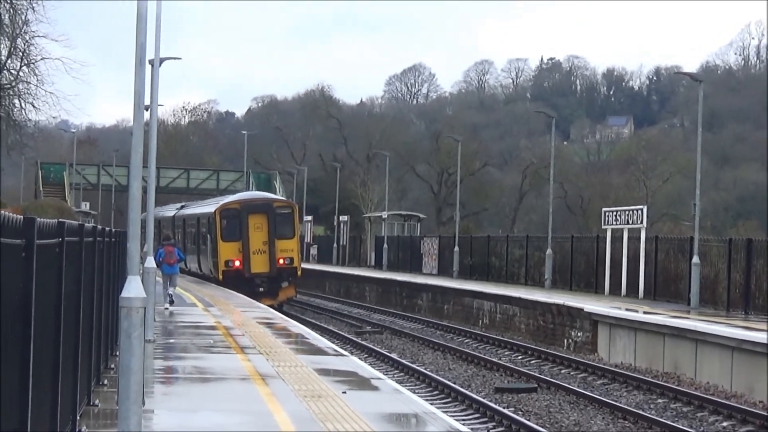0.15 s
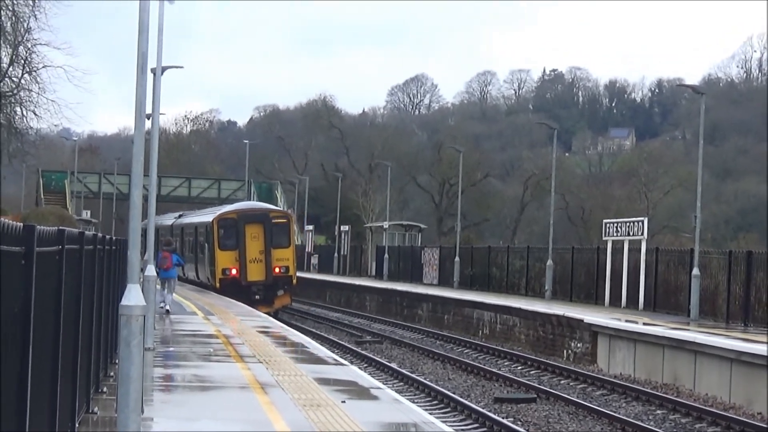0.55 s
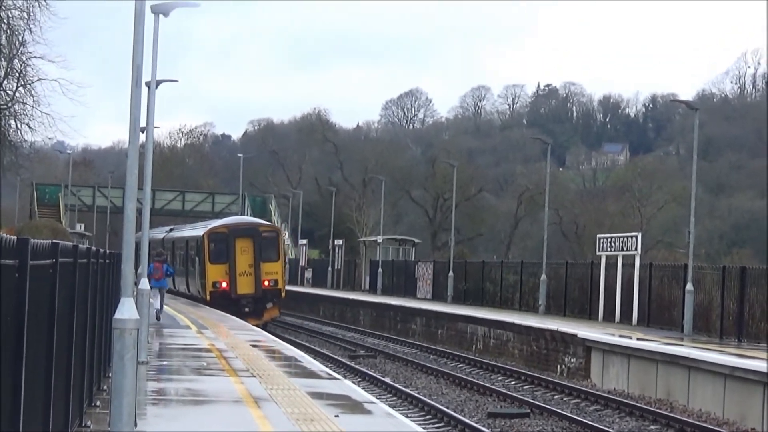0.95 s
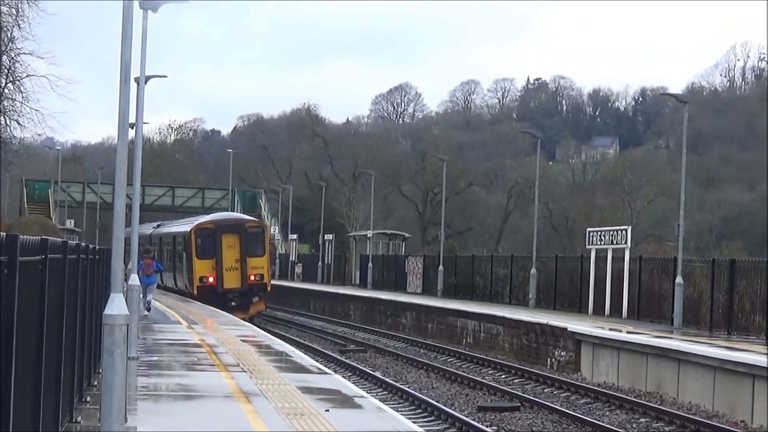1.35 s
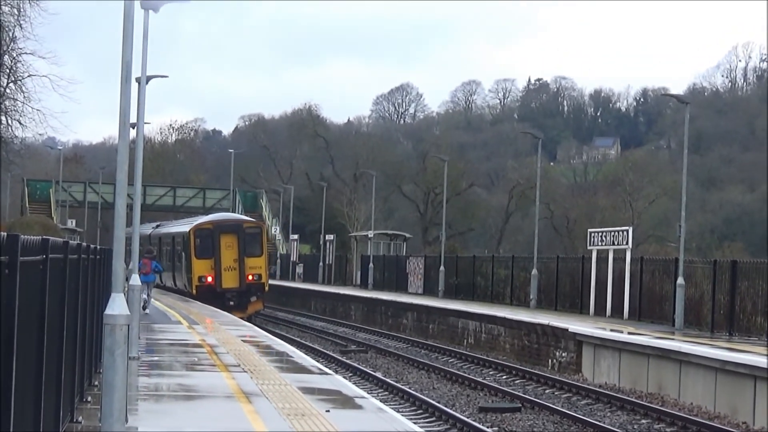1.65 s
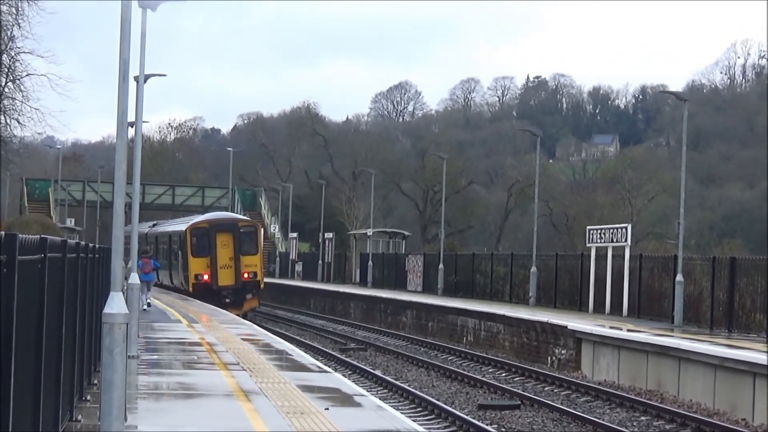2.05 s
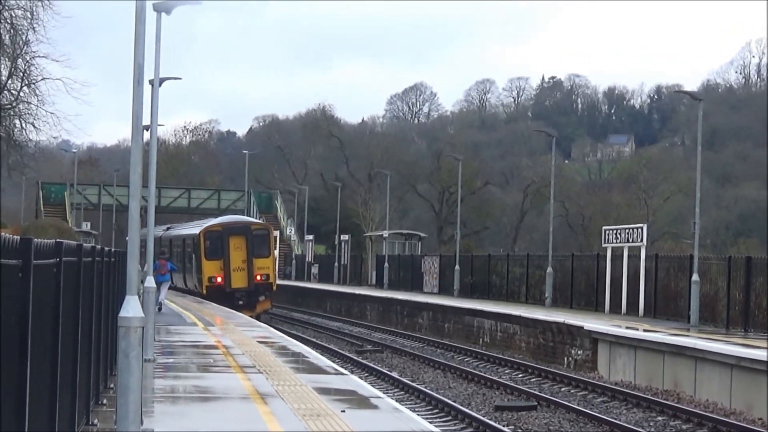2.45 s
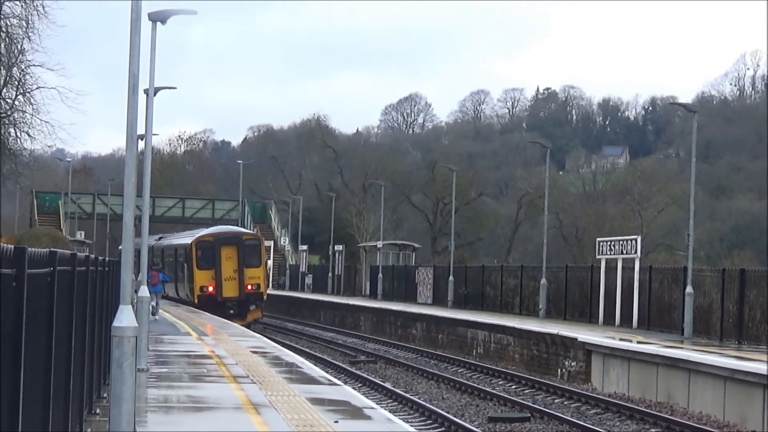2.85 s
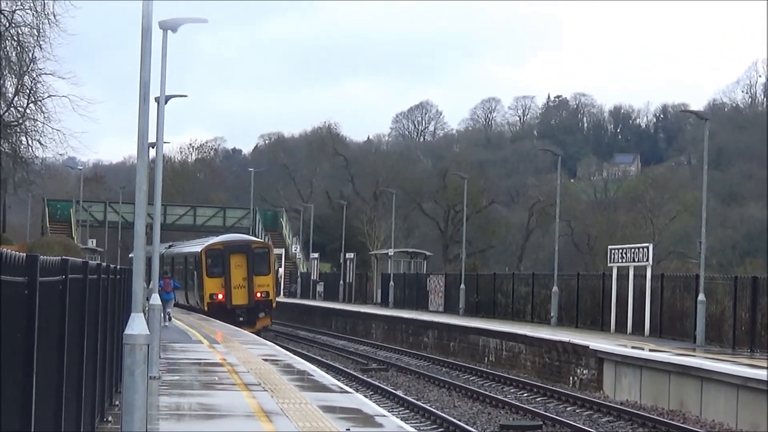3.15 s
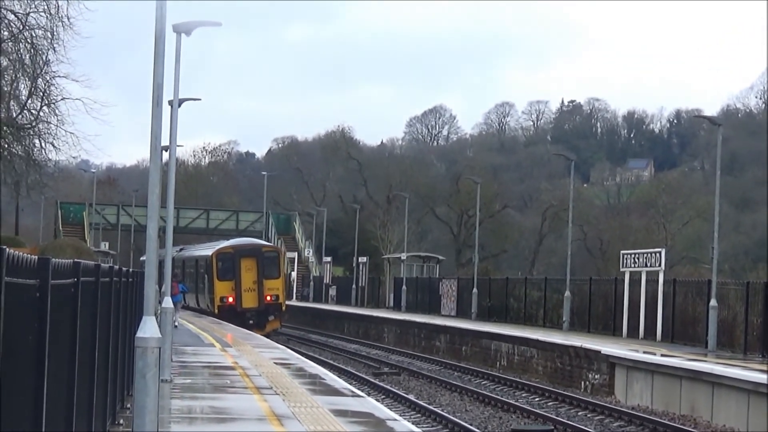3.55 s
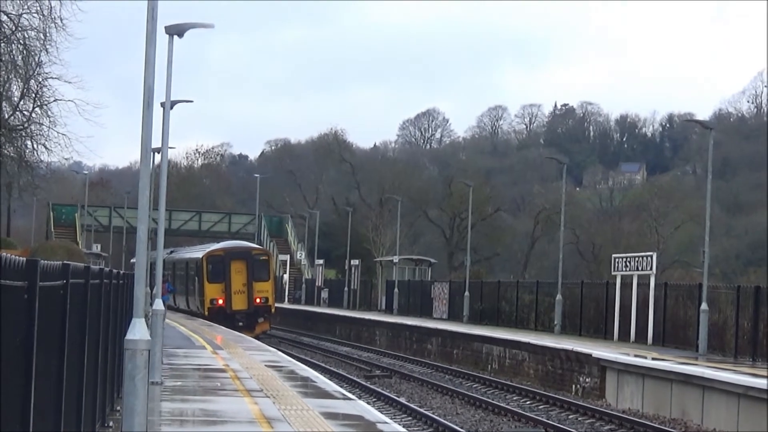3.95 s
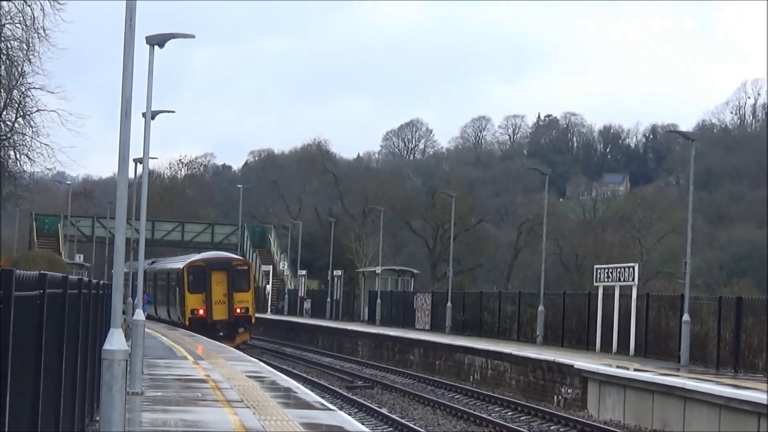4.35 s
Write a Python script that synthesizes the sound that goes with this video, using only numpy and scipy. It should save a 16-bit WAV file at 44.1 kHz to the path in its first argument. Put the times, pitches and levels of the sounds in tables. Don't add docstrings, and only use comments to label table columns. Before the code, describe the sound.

Steady, broad diesel rumble and outdoor hiss fill a wide stereo space on an open platform, the distant train slightly left. In the first half second only faint high squeaks and small ticks show. From about 0.5 s thin, very high whistles flicker in, with a short gliding chirp near 0.7 s and a brief scrape and ragged cry at 0.9 s. Crisp close ticks fall around 1.1-1.2 s, with a strong knock at 1.54 s. From 1.6 to 3 s brake blocks bite repeatedly, making stuttering, gritty screeches over beating mid-high squeals, while a piercing purer tone swells from about 2.5 s. It thins near 3.1 s, then that tone flares at 3.4 s with more rough bites until 3.8 s. From 3.9 s a dense, rasping final shudder and squeal carry on to the end at 4.5 s. Soft footfall thuds and faint echoes lie underneath.

```python
import sys
import numpy as np
from scipy import signal
from scipy.fft import rfft, irfft, next_fast_len
from scipy.io import wavfile
from scipy.ndimage import uniform_filter1d, minimum_filter1d, map_coordinates

SR = 44100
rng = np.random.default_rng(int(sys.argv[2]) if len(sys.argv) > 2 else 0)


def put_to_file(sound):
    columns = np.atleast_2d(sound).T
    safe = np.clip(columns, -1, 1)
    whole_steps = np.round(safe * 32767)
    wavfile.write(sys.argv[1], SR, whole_steps.astype(np.int16))


def rack_gain(trim_db):
    fader = np.asarray(trim_db, float)
    return 10 ** (fader / 20)


N = 198273
TIME = np.arange(N) / SR


def unit(x):
    return x / np.sqrt(np.mean(np.abs(x) ** 2) + 1e-20)


def along(points, hz):
    f, v = np.transpose(points)
    return np.interp(np.log(hz + 1), np.log(f + 1), v)


def curves(rows):
    s, *columns = np.transpose(rows)
    since_start = TIME - s[0] + (s[0] < .01)
    until_end = s[-1] - TIME + (s[-1] > 4.48)
    gate = np.clip(np.minimum(since_start, until_end) / .02, 0, 1)
    return [np.interp(TIME, s, column) for column in columns] + [gate]


def held(rows):
    db, gate = curves(rows)
    return gate * rack_gain(db)


def swells(rates, rows):
    growth, decay = rates
    s, hold, db = np.transpose(rows)[..., None]
    growing_db = growth * np.maximum(s - TIME, 0)
    dying_db = decay * np.maximum(TIME - s - np.abs(hold), 0)
    return np.sqrt(np.sum(rack_gain(db - growing_db - dying_db) ** 2, axis=0) + 1e-20)


def wobble(rate):
    coarse = TIME[::16]
    knots = rng.standard_normal(int(N * rate / SR) + 4)
    return unit(np.interp(TIME, coarse, map_coordinates(knots, [coarse * rate])))


def filtered(x, response):
    m = next_fast_len(N + SR // 2)
    return irfft(rfft(x, m) * response(np.fft.rfftfreq(m, 1 / SR)), m)[..., :N]


def resonances(table):
    def response(f):
        return sum((-1) ** k * rack_gain(db) * 1j * f * width / (hz * hz - f * f + 1j * f * width)
                   for k, (hz, width, db) in enumerate(table))
    return response


def patchy(count, patchy_db):
    z = signal.stft(rng.standard_normal((count, N)), nperseg=512)[2]
    field = uniform_filter1d(rng.standard_normal(z.shape[1:]), size=6, axis=0)
    field = uniform_filter1d(field, size=8, axis=1)
    return signal.istft(z * rack_gain(patchy_db * unit(field)), nperseg=512)[1][:, :N]


# (time [s], speed [m/s])
ROLLING_SPEED = [(.9, 1.63), (2, 1.46), (2.5, 1.06), (3.1, .6), (3.5, .53), (3.9, .17), (4.4, 0)]


def creep(rest_hz, hz_per_speed):
    return [(s, rest_hz - hz_per_speed * speed) for s, speed in ROLLING_SPEED]


def singing(track, rough, width_hz, skirt_db):
    scatter = rough * (wobble(width_hz) + 1j * wobble(width_hz))
    chatter = rack_gain(skirt_db) * (wobble(300) + 1j * wobble(300))
    pitch_hz = np.interp(TIME, *np.transpose(track)) + 3.5 * wobble(6)
    return unit(1 + scatter + chatter) * np.exp(2j * np.pi * np.cumsum(pitch_hz) / SR)


def squeal(track, level, rough, width_hz, skirt_db):
    return np.sqrt(2) * level * singing(track, rough, width_hz, skirt_db)


def mode(rest_hz, hz_per_speed, song, rough, width_hz, skirt_db):
    return squeal(creep(rest_hz, hz_per_speed), swells(*song), rough, width_hz, skirt_db)


def wheels():
    top, under = highest_pair()
    loud = strongest_mode()
    low, twin, octave = low_pair()
    mixed = contact_tones(under, loud, low)
    return (top + under + loud + low + twin + octave + thin_pair() + brief_modes() + mixed).real


# (time [s], level [dB])
STRONGEST = [(1.0, -48.5), (1.75, -33), (2.42, -22.5), (2.53, -12), (2.64, -13.5), (2.73, -20.5),
             (2.78, -8), (2.83, -21), (3.0, -19.5), (3.4, -5), (3.47, -7.5), (3.55, -20), (3.585, -34),
             (3.63, -30), (3.97, -35.5), (4.03, -34), (4.38, -29), (4.5, -24)]


def strongest_mode():
    return squeal(creep(10330, 30), held(STRONGEST), rough=.12, width_hz=40, skirt_db=-17)


# (time [s], level [dB], share of the twin [0-1])
LOW_PAIR = [(1.22, -57, 1), (1.3, -47, 0.96), (1.43, -31.5, 1), (1.52, -28.5, 0.46), (1.68, -22.5, 0.53),
            (1.79, -19, 0.91), (1.99, -23, 0.36), (2.43, -17.5, 0.11), (2.89, -17, 0.05),
            (2.97, -20.5, 0.3), (3.03, -25.5, .3), (3.15, -29.5, 0.2), (3.22, -40, 0.5), (3.4, -32, 0.3),
            (3.44, -25, 1), (3.65, -26.5, 0.1), (3.84, -22, 0.02), (3.97, -28, 0.6), (4.02, -20, 0.4),
            (4.29, -22.5, 0.76), (4.36, -16.5, 0.15), (4.5, -23, 0)]


def low_pair():
    db, share, gate = curves(LOW_PAIR)
    share = np.clip(share, 0, 1)
    cycle = singing(creep(5260, 20), rough=0.68, width_hz=60, skirt_db=-6.5)
    twin = singing(creep(5294, 14), rough=0.56, width_hz=50, skirt_db=-13.5)
    level = np.sqrt(2) * gate * rack_gain(db)
    low_level = level * np.sqrt(1 - share)
    octave = rack_gain(-3 - 14.5) * (low_level / rack_gain(-14.5)) ** 1.34 * unit(cycle ** 2)
    return low_level * cycle, level * np.sqrt(share) * twin, octave


# (time [s], hold [s], level [dB])
TOP_SONG = ((241, 161), [(.581, .181, -27.2), (.761, .032, -23.2), (.851, .371, -27), (1.251, .231, -23.2),
            (1.581, .351, -23.2), (2.031, .501, -29), (2.581, .011, -33.5), (2.721, .321, -36),
            (3.151, .151, -50), (3.801, .191, -41.5), (4.041, .081, -29.2), (4.221, .011, -22.2),
            (4.371, .022, -21.2)])
UNDER_SONG = ((110, 170), [(.76, .2, -29), (1.1, .15, -32), (1.33, .22, -28), (1.68, .5, -32.5),
              (2.3, .2, -38), (2.58, .35, -32.5), (2.98, .3, -35), (4.26, .19, -30)])


def highest_pair():
    top = mode(14499, 5, TOP_SONG, rough=0.036, width_hz=24.3, skirt_db=-25)
    under = mode(14428, 40, UNDER_SONG, rough=0.25, width_hz=25.45, skirt_db=-5.5)
    return top * rack_gain(2.2 * wobble(18)), under


# (time [s], hold [s], level [dB])
BEAT_SONG = (180, 210), [(2.1, .3, -52), (2.52, 0.38, -32), (2.88, 0.13, -44), (3.04, .1, -40),
             (3.18, .21, -36.5)]


def contact_tones(under, loud, low):
    beat = mode(14428 - 10330, 40 - 30, BEAT_SONG, rough=.25, width_hz=30.16, skirt_db=-7)
    beat = beat * rack_gain(2.5 * wobble(13))
    return rack_gain(23.5) * under * low.conj() + beat + rack_gain(-7) * loud * beat.conj()


# (time [s], hold [s], level [dB])
THIN_SONG = (180, 770), [(.75, 0.057, -21), (.9, 0.041, -28), (1.0, 0.072, -37)]
THINNER_SONG = (140, 127), [(.82, .01, -43), (.955, 0.009, -19.5)]


def thin_pair():
    thin = mode(11368, 0, THIN_SONG, rough=0.15, width_hz=38.5, skirt_db=-18)
    return thin + mode(11270, 0, THINNER_SONG, rough=0.55, width_hz=50.0, skirt_db=-2.7)


# (time [s], hold [s], level [dB])
EARLY_SONG = (330, 240), [(0, 0.065, -31.5), (.16, 0.059, -37), (.26, 0.078, -44.5), (1.19, .01, -39.5),
              (2.88, .05, -43), (3.3, .05, -37.5), (3.42, .01, -46)]
JUMP_SONG = (530, 144), [(.91, 0.087, -25.5)]
SIDE_RIM_SONG = (320, 590), [(.46, 0.14, -42.5), (.84, 0.23, -37), (1.64, 0.3, -38), (1.96, 0.069, -33),
                 (2.02, 0.1, -32), (2.26, 0.64, -31.5), (2.92, 0.072, -35), (3.45, 0.23, -33),
                 (3.98, .18, -44), (4.25, 0.0038, -14), (4.36, 0.025, -19.5), (4.45, .05, -23)]
MIDDLE_SONG = (330, 102), [(.29, 0.13, -47), (.44, .02, -33.5), (.507, 0.043, -23), (3.76, 0.069, -37),
               (3.85, 0.069, -33), (3.91, 0.14, -29.5)]
CHIRP_SONG = (390, 220), [(.1, 0.52, -52), (.676, 0.17, -34.5), (.905, 0.045, -21), (.98, 0.036, -34.5),
              (1.08, 0.016, -36)]
TIP_SONG = (400, 400), [(3.83, .2, -59), (4.05, .26, -47)]
UPPER_SONG = (400, 480), [(3.5, 0.022, -19), (3.575, 0.014, -18), (3.65, 0.024, -31), (3.74, 0.037, -32),
              (3.8, 0.044, -34)]
# (time [s], pitch [Hz])
MIDDLE_TRACK = [(.3, 7110), (.55, 7065), (3.9, 7088)]
CHIRP_TRACK = [(.6, 3095), (.66, 2980), (.7, 3260), (.73, 3310), (.8, 3310), (.83, 3095)]


def brief_modes():
    early = mode(8014, 33, EARLY_SONG, rough=0.26, width_hz=60.7, skirt_db=-7.0)
    jump = mode(8010, 0, JUMP_SONG, rough=0.4, width_hz=62.8, skirt_db=7.8)
    side = mode(8415, 15, SIDE_RIM_SONG, rough=0.44, width_hz=50, skirt_db=-11)
    middle = squeal(MIDDLE_TRACK, swells(*MIDDLE_SONG), rough=0.81, width_hz=90, skirt_db=0.5)
    chirp = squeal(CHIRP_TRACK, swells(*CHIRP_SONG), rough=0.32, width_hz=90, skirt_db=-5)
    tip = mode(15502, 0, TIP_SONG, rough=.3, width_hz=40, skirt_db=-14)
    upper = mode(10522, 20, UPPER_SONG, rough=.3, width_hz=40, skirt_db=-8)
    return early + jump + side + middle + chirp + tip + upper


def brakes():
    return first_judder() + second_judder() + third_judder()


# (frequency [Hz], level [dB])
DISTANCE_COLOUR = [(300, -26), (1500, -9), (2500, -3.5), (9500, 1.5), (11000, -1.5), (12500, -27),
                   (16000, -38)]


def judder(force, body, rim, grip, lumpy_db, fill_db, rim_db, rim_power):
    lumps = rack_gain(lumpy_db * np.array([wobble(45), wobble(45), 0 * TIME]))
    noises = patchy(count=3, patchy_db=1.85) * lumps
    inner, outer, rasp = filtered(noises, lambda hz: rack_gain(along(DISTANCE_COLOUR, hz)))
    rim_gain = rack_gain(rim_db) * np.maximum(force / rack_gain(-32.0), .05) ** rim_power
    rings = unit(filtered(inner, resonances(body))) + rim_gain * unit(filtered(outer, resonances(rim)))
    pressure = force + uniform_filter1d(grip, size=3000)
    rasp_level = pressure * (pressure / rack_gain(-35.0)) ** 0.16 * rack_gain(fill_db)
    return (force + grip) * rings + rasp_level * unit(rasp)


# (time [s], hold [s], level [dB])
FIRST_PRESSURE = (660, 200), [(.65, 0.18, -43.5), (.905, 0.023, -23)]
# (frequency [Hz], width [Hz], level [dB])
FIRST_BODY_RINGS = [(3000, 190, 3.5), (4350, 40, -24), (5530, 59, -2.5), (5750, 100, -14), (5930, 17, 12),
                    (6320, 230, -8)]
FIRST_RIM_RINGS = [(8300, 220, 8), (8430, 210, 8.5), (9270, 190, -3), (10300, 90, -2), (11550, 140, 1)]


def first_judder():
    return judder(swells(*FIRST_PRESSURE), FIRST_BODY_RINGS, FIRST_RIM_RINGS, np.zeros(N),
                  lumpy_db=-1.0, fill_db=-20, rim_db=5, rim_power=-.03)


# (time [s], hold [s], level [dB])
SECOND_PRESSURE = (2700, 117), [(1.62, 0.039, -39.5), (1.75, 0.23, -39), (2.02, 0.11, -39),
                   (2.24, 0.52, -30.5), (2.91, 0.042, -34), (3.1, 0.36, -53), (3.435, 0.062, -32.5),
                   (3.51, 0.14, -35.5), (3.7, 0.14, -36.5)]
# (frequency [Hz], width [Hz], level [dB])
SECOND_BODY_RINGS = [(1930, 74, -4.5), (2560, 60, 8.5), (2630, 65, 4.5), (2793, 54, 7.5), (3143, 110, -9),
                     (3788, 54, -2), (4590, 69, -10), (4600, 25, -18)]
SECOND_RIM_RINGS = [(5220, 110, -2), (5720, 180, -17.5), (6030, 27, -10), (6430, 42, -11.5), (6810, 19, -8),
                    (7300, 18, -8.5), (7793, 134, 3.5), (7980, 80, 2), (9370, 25, -3.5), (10420, 43, -4),
                    (11350, 44, -13), (11900, 140, -2.5), (12300, 40, -7)]
# (time [s], peak level [dB], hold [s])
BITES = [(1.624, -17.5, 0.032), (1.733, -40, 0.028), (1.775, -35, 0.032), (1.839, -12, 0.024),
         (1.899, -11.5, 0.016), (1.954, -16, 0.022), (2.031, -10, 0.016), (2.063, -15.5, 0.031),
         (2.127, -16.5, 0.029), (2.217, -9, 0.01), (2.265, -14.5, 0.037), (2.362, -11, 0.015),
         (2.442, -8.5, 0.031), (2.477, -9, 0.074), (2.507, -16, 0.027), (2.591, -19, 0.049),
         (2.613, -13, 0.045), (2.668, -27, 0.032), (2.728, -8, 0.033), (2.797, -9.5, 0.047),
         (2.884, -8.5, 0.015), (2.9305, -6, 0.015), (3.432, -8.5, 0.017), (3.511, -12, 0.019),
         (3.573, -14.5, 0.016), (3.62, -17, .015), (3.639, -21, 0.023), (3.711, -17.5, 0.02),
         (3.752, -14, 0.014), (3.79, -22, .025)]


def second_judder():
    bites, age = np.zeros(N), np.zeros(N)
    for s, db, hold in BITES:
        t = np.maximum(TIME - s, 0)
        bites += rack_gain(db - 17.0) * (1 - np.exp(-t / 0.0042)) / (1 + (t / hold) ** 4)
        age = np.where(TIME > s, t, age)
    chatter = judder(swells(*SECOND_PRESSURE), SECOND_BODY_RINGS, SECOND_RIM_RINGS, bites,
                     lumpy_db=3.5, fill_db=-6.0, rim_db=8.5, rim_power=-0.025)
    return chatter + slips(bites, age)


SLIP_ORDERS = [-19.5, -15, -2]


def slips(bites, age):
    rate_hz = 2605 * (1 + .012 * np.minimum(age / 0.034, 1.5) + .008 * wobble(30))
    phase = 2 * np.pi * np.cumsum(rate_hz) / SR
    stack = np.zeros(N)
    for order, db in enumerate(SLIP_ORDERS, start=1):
        grain = singing([(0, 0.0032)], rough=0.87, width_hz=90, skirt_db=2)
        stack += rack_gain(db) * (grain * np.exp(1j * order * phase)).real
    return bites * stack


# (time [s], hold [s], level [dB])
THIRD_PRESSURE = (680, 370), [(3.92, 0.0029, -27), (4.005, 0.21, -21), (4.21, 0.039, -19),
                  (4.29, 0.065, -33), (4.36, 0.18, -19)]
# (frequency [Hz], width [Hz], level [dB])
THIRD_BODY_RINGS = [(2217, 38, -8), (2438, 29, -4), (2829, 52, 1), (3050, 27, -3.5), (3330, 32, -6.5),
                    (3920, 27, -1.5), (4510, 80, -13), (4690, 37, -12), (5030, 32, -6)]
THIRD_RIM_RINGS = [(5680, 69, -8.5), (6000, 26, 0), (6430, 53, -15), (6640, 28, -12), (6900, 73, -10.5),
                   (7180, 26, -7), (7300, 27, -3.5), (7710, 29, -0.5), (7990, 90, -1), (8440, 73, -7),
                   (8840, 71, -14), (9410, 33, -2.5), (10340, 80, -7.5), (12180, 73, 8.5)]


def third_judder():
    return judder(swells(*THIRD_PRESSURE), THIRD_BODY_RINGS, THIRD_RIM_RINGS, np.zeros(N),
                  lumpy_db=1.26, fill_db=-6.5, rim_db=5, rim_power=-0.28)


def glide(s, end, hz, end_hz, db, rough, width_hz, skirt_db):
    return squeal([(s, hz), (end, end_hz)], held([(s, db), (end, db)]), rough, width_hz, skirt_db).real


# (time [s], end [s], pitch [Hz], end pitch [Hz]), then their levels [dB]
FRAME_NOTES = [(.82, .91, 1350, 1330), (1.08, 1.13, 1920, 1880), (1.15, 1.46, 1800, 1700),
               (4.1, 4.45, 780, 740), (.55, .75, 4650, 4650)]
FRAME_LEVELS = [-44.5, -36.5, -43, -46, -53]


def frame_groans():
    return sum(glide(*row, db, rough=1.0, width_hz=170, skirt_db=2.7)
               for row, db in zip(FRAME_NOTES, FRAME_LEVELS))


# (time [s], end [s], pitch [Hz], end pitch [Hz]), then their levels [dB]
STRAND_NOTES = [(.66, .84, 3050, 3095), (.88, 1.05, 5230, 5270), (4.12, 4.31, 3315, 3300),
                (3.41, 3.5, 5030, 5060), (3.1, 3.4, 6430, 6430), (2.3, 2.76, 3850, 3830),
                (2.89, 3.02, 3830, 3880), (3.16, 3.24, 3850, 3850), (3.3, 3.37, 3900, 3900),
                (3.3, 3.35, 6120, 6120), (4.3, 4.47, 3880, 3910), (4.3, 4.47, 9350, 9370),
                (4.1, 4.49, 11300, 11320)]
STRAND_LEVELS = [-37.5, -42, -36, -28.5, -43.5, -38, -33, -38, -32.5, -32, -29, -30, -34]


def thin_strands():
    return sum(glide(*row, db, rough=0.71, width_hz=50, skirt_db=-0.5)
               for row, db in zip(STRAND_NOTES, STRAND_LEVELS))


# (time [s], peak level [dB], centre [Hz], width [Hz], t60 [s])
TICKS_AND_THUDS = [(0.119, -24.5, 3130, 2500, 0.022), (0.288, -32.5, 347, 300, 0.024),
                   (0.498, -27, 6950, 250, .04), (0.52, -12.5, 8750, 5000, 0.015),
                   (.907, -26.5, 503, 600, 0.042), (1.075, -17.5, 2670, 2000, 0.007),
                   (1.081, -18, 3000, 2000, 0.0092), (1.19, -6.5, 8300, 2400, 0.024),
                   (1.211, -20, 1200, 1520, 0.0079), (1.538, -1, 3520, 7060, 0.019),
                   (1.539, -12, 1460, 900, .02), (1.541, -27, 500, 600, 0.027),
                   (1.814, -6.5, 8440, 2530, 0.0042), (2.77, -33, 305, 299, 0.023),
                   (2.827, -17, 1414, 1510, 0.012), (3.365, -39, 352, 298, 0.041),
                   (3.95, -48, 300, 300, .04)]


def knocks():
    out, t = np.zeros(N + SR), np.arange(SR // 10) / SR
    hz_bins = np.fft.rfftfreq(len(t), 1 / SR)
    for s, db, hz, width_hz, t60 in TICKS_AND_THUDS:
        crack = rng.standard_normal(len(t)) * rack_gain(-60 * t / t60)
        ring = irfft(rfft(crack) * resonances([(hz, width_hz, 0)])(hz_bins) ** 2, len(t))
        out[round(s * SR):][:len(t)] += rack_gain(db) * ring / np.abs(ring).max()
    return filtered(out[:N], lambda hz: 1 / (1 + 1j * hz / 11500) ** 2 / (1 + (hz / 12500) ** 12))


# (frequency [Hz], level [dB])
ENGINE_ORDERS = [(70, -76), (372, -60), (743, -57)]


def idling():
    return sum(glide(0, 4.1, hz, hz, db, rough=0.21, width_hz=14, skirt_db=-29) for hz, db in ENGINE_ORDERS)


# (frequency [Hz], t60 [s])
VALLEY_DECAY = [(500, 0.164), (4000, 1), (12000, 0.15)]


def valley(x):
    hz, t, z = signal.stft(rng.standard_normal((2, SR // 2)), SR, nperseg=256)
    fade = rack_gain(-60 * t / along(VALLEY_DECAY, hz)[:, None])
    tail = signal.istft(z * fade, SR, nperseg=256)[1]
    delayed = np.pad(x, (400, 0))[None]
    return signal.fftconvolve(delayed, tail / np.linalg.norm(tail[0]), axes=1)[:, :N]


# (frequency [Hz], density [dB per Hz])
AIR_COLOUR = [(15, -55), (27, -22), (91, -19.5), (315, -3), (808, 0), (2570, -4.5), (8890, -9),
              (15600, -28)]
# (time [s], level [dB])
ENGINE_LOAD = [(0.0, -46), (0.56, -45.5), (1.36, -43.5), (3.8, -46), (4.5, -43.5)]
# (frequency [Hz], correlation [0-1])
LIKENESS = [(60, .95), (250, .92), (1000, .86), (4000, .9), (12000, .9)]


def air():
    def mid_side(hz):
        angle = np.arccos(np.clip(along(LIKENESS, hz), -1, 1)) / 2
        return rack_gain(along(AIR_COLOUR, hz)) * [np.cos(angle), np.sin(angle)]
    mid, side = filtered(patchy(count=2, patchy_db=1.48), mid_side)
    level_db = curves(ENGINE_LOAD)[0] + 6.0 + 0.057 * wobble(3.3)
    return rack_gain(level_db) * unit(np.array([mid + side, mid - side]))


def scene():
    rough = brakes() + knocks() + frame_groans() + thin_strands() + idling()
    to_the_left = rack_gain([[.15], [-.15]])
    return (wheels() + rough) * to_the_left + rack_gain(-30) * valley(rough) + air()


def low_pass(x):
    return signal.sosfilt(signal.butter(12, 15800, fs=SR, output="sos"), x)


# (frequency [Hz], phase [rad])
PORT_LEAD = [(25, -0.68), (125, 0.9), (430, -1.21), (1030, -1.29), (3530, -0.82), (5860, -0.51),
             (9400, -0.29), (15300, -0.28)]


def record(dry):
    ports = filtered(dry, lambda hz: np.exp(.5j * np.outer([1, -1], along(PORT_LEAD, hz))))
    needed = np.minimum(1, .99 / (np.abs(ports).max(axis=0) + 1e-9))
    gain = uniform_filter1d(minimum_filter1d(needed, size=441), size=441)
    return low_pass(ports * gain)


dry = scene()
out = record(dry)
put_to_file(out)
```